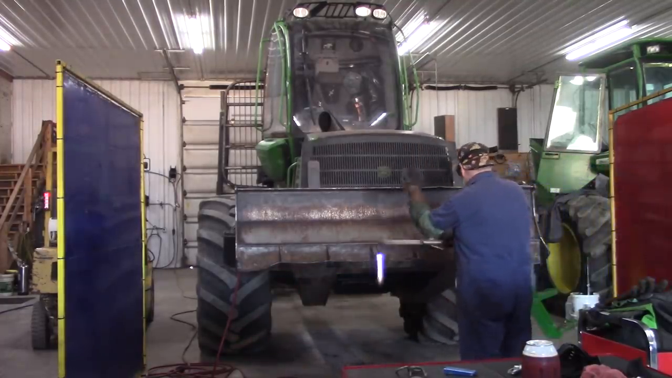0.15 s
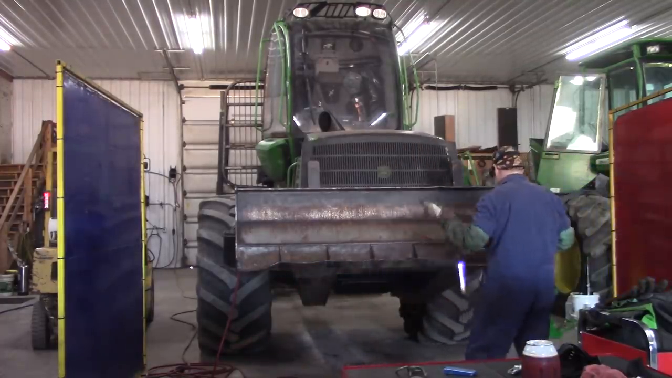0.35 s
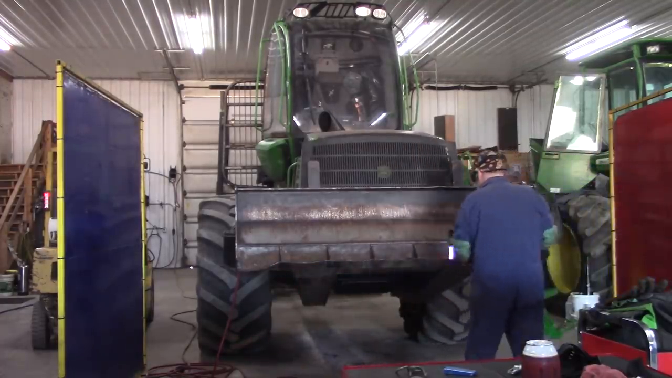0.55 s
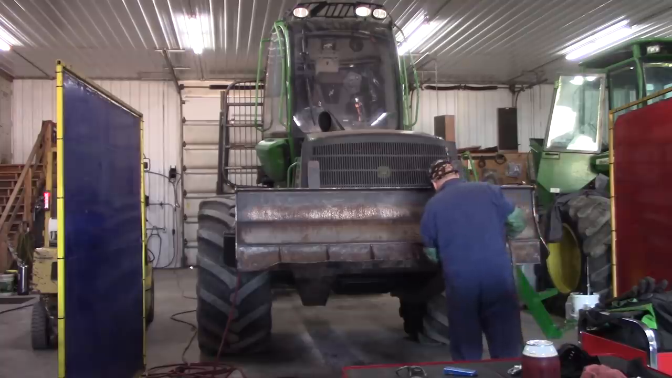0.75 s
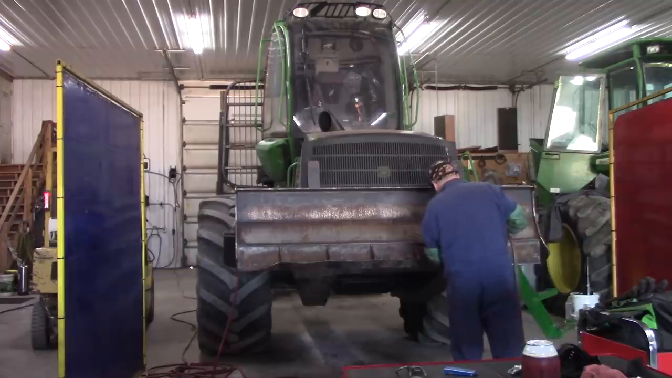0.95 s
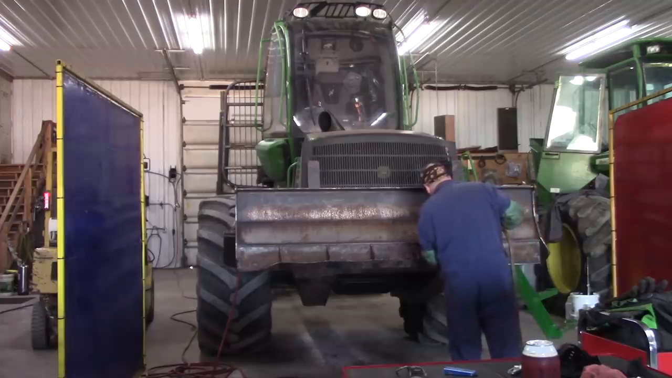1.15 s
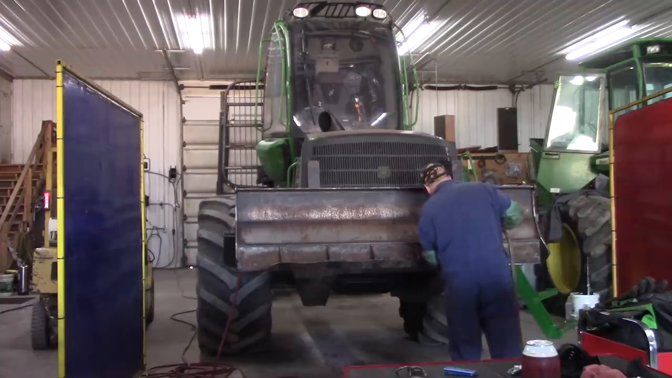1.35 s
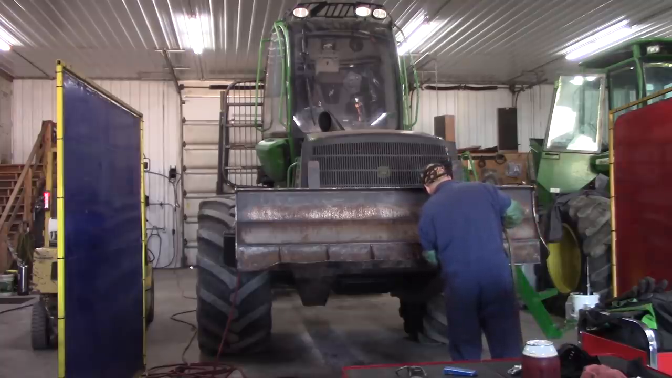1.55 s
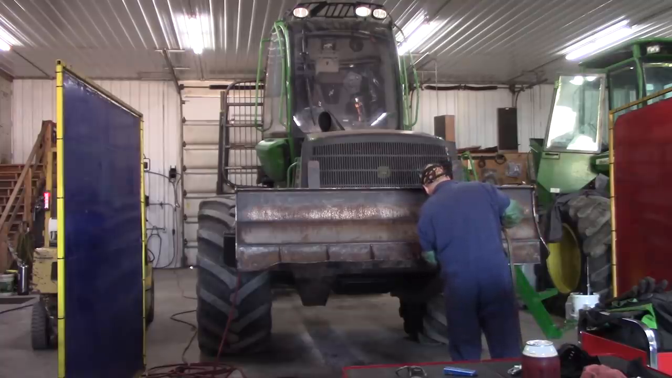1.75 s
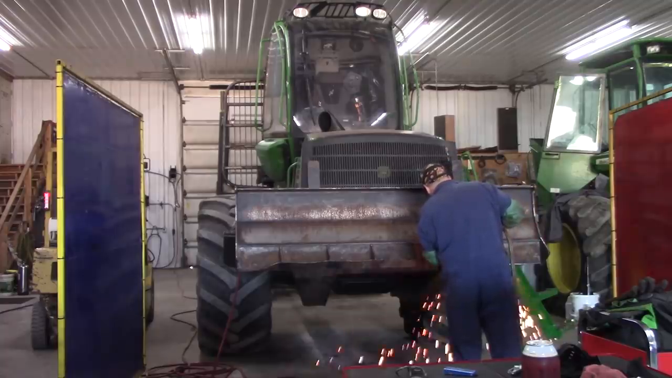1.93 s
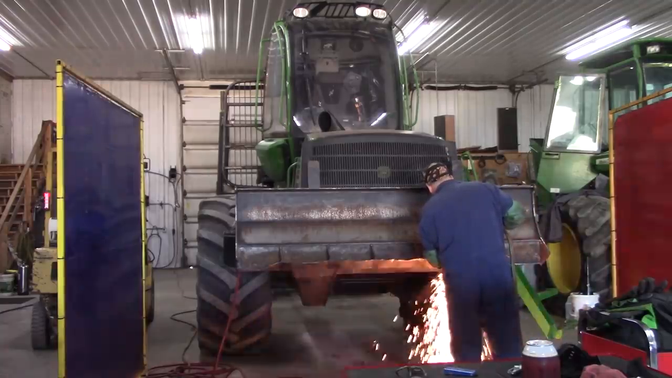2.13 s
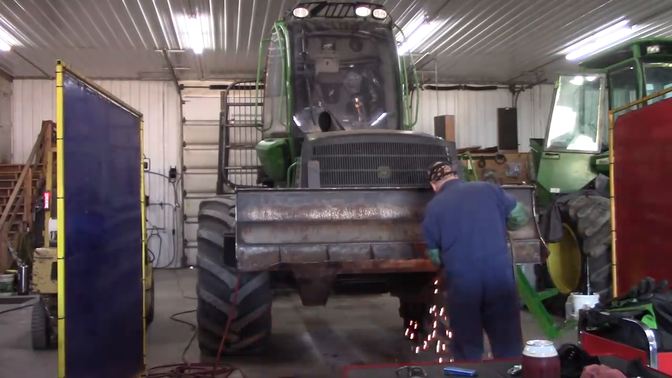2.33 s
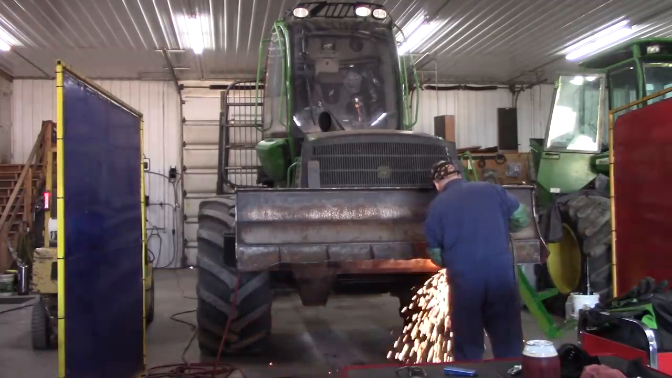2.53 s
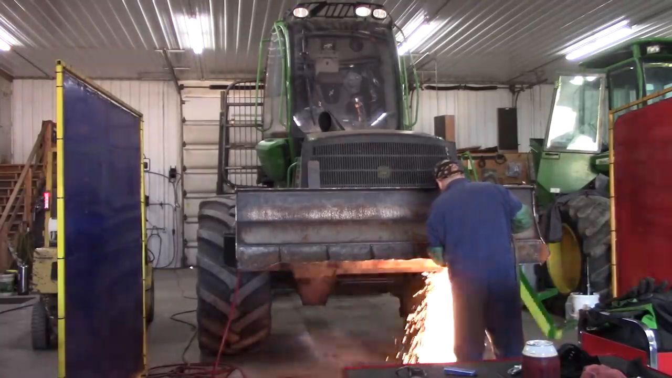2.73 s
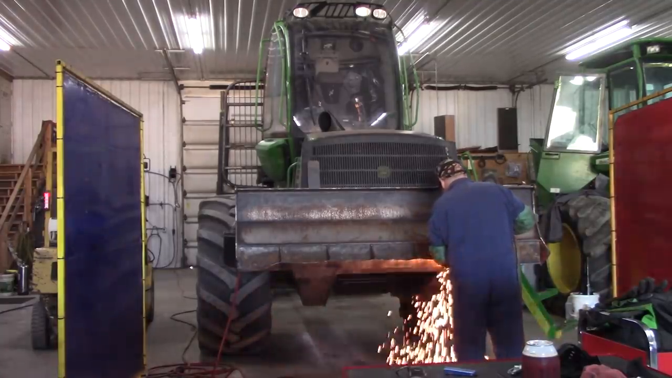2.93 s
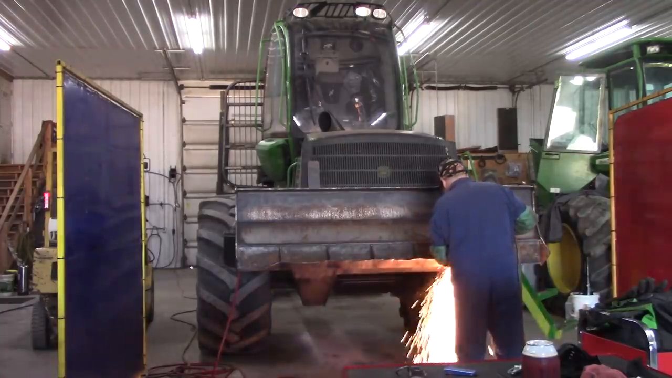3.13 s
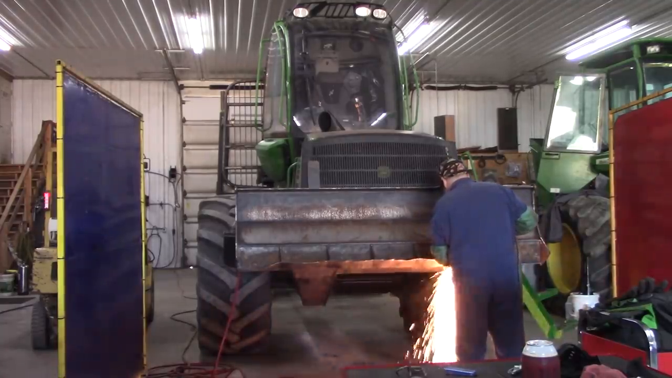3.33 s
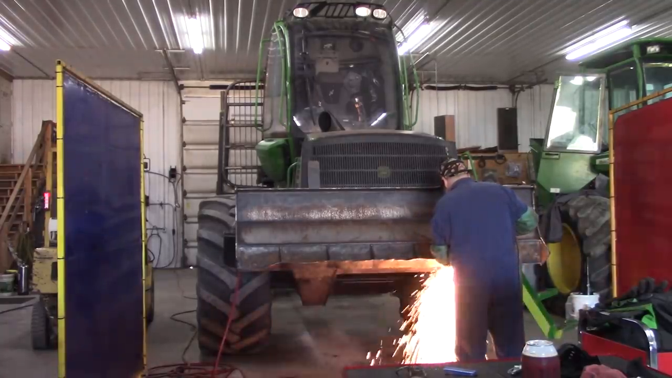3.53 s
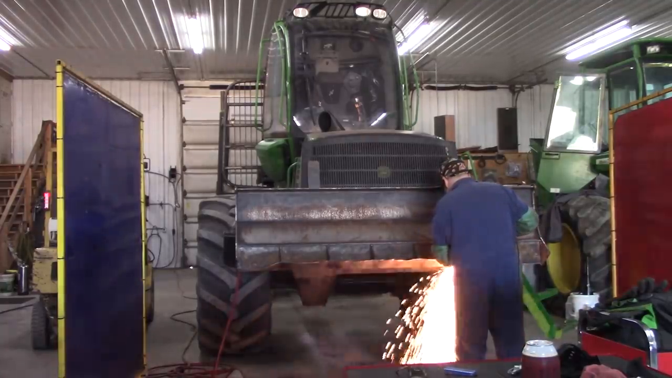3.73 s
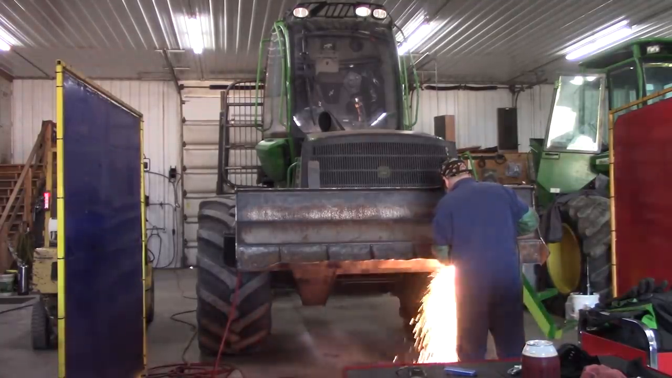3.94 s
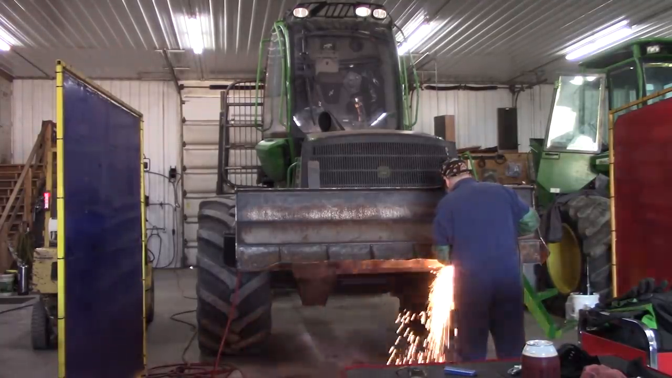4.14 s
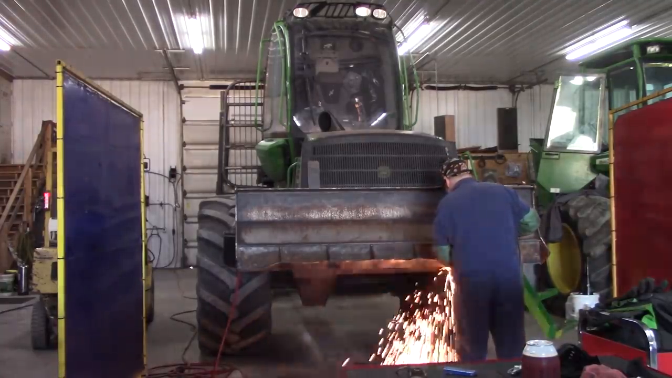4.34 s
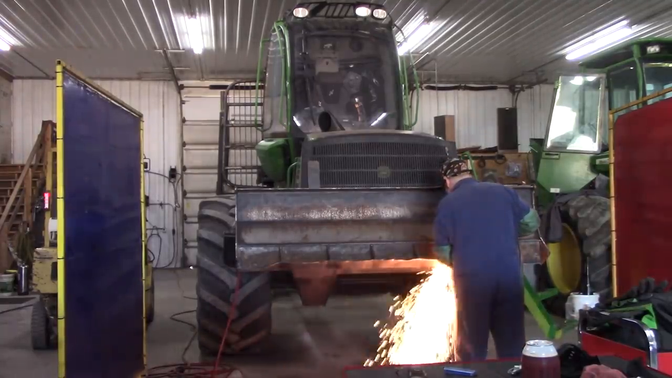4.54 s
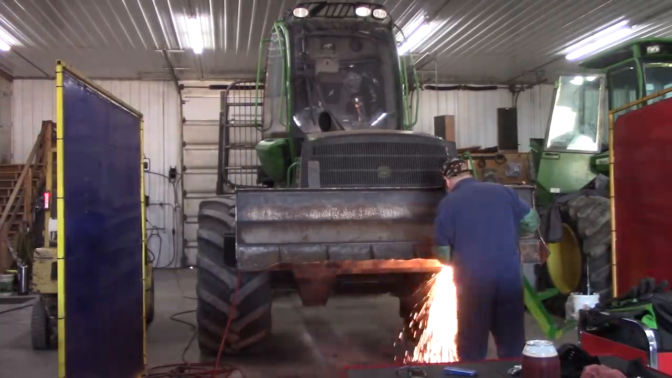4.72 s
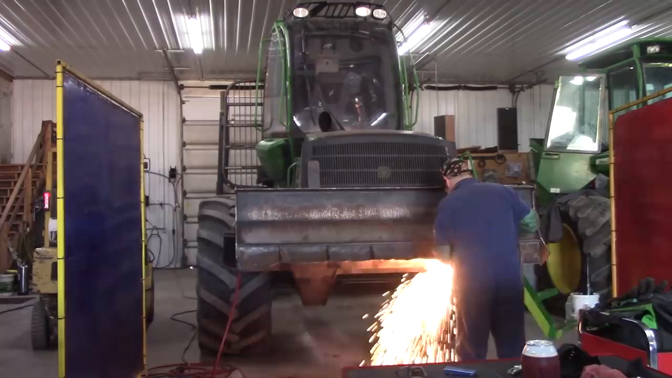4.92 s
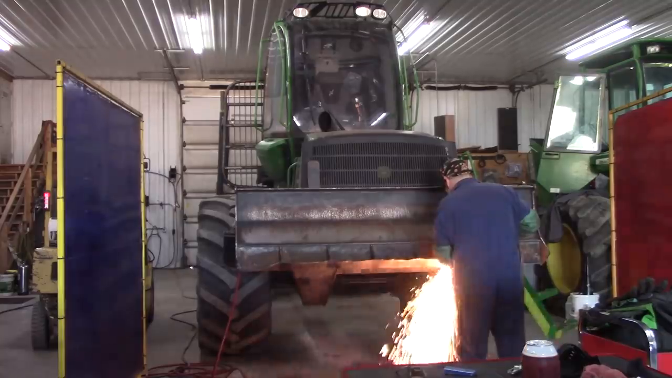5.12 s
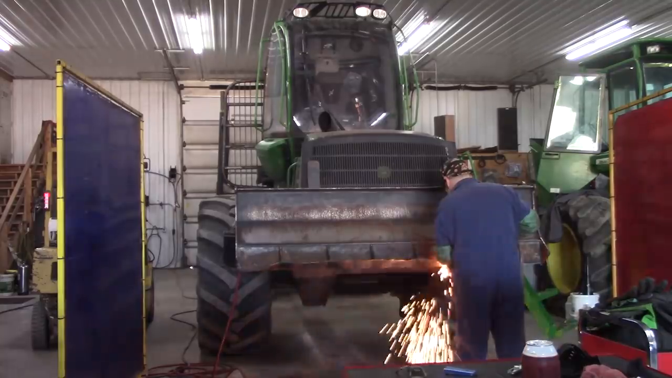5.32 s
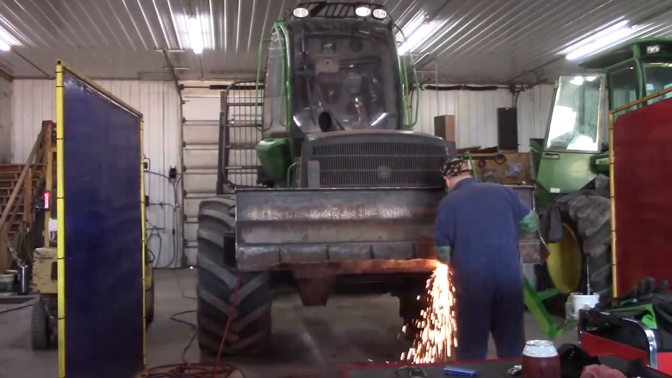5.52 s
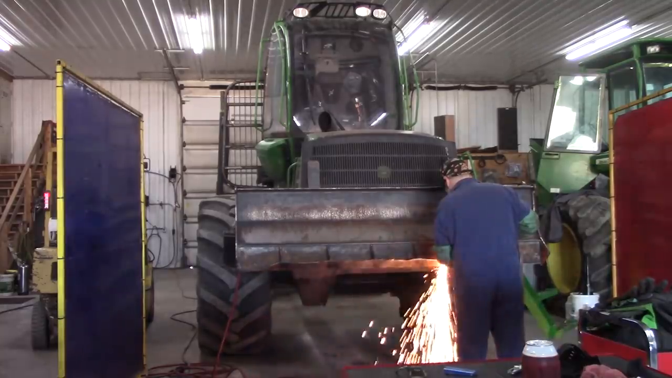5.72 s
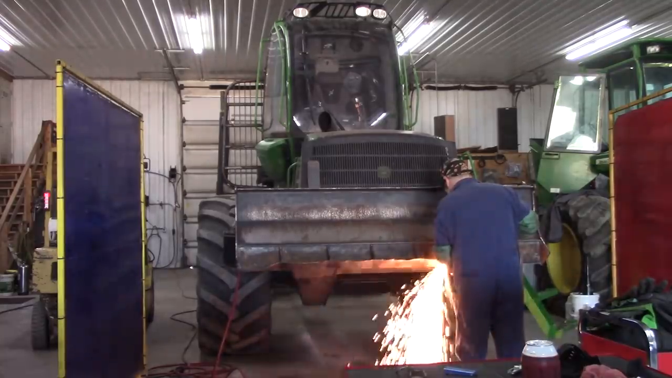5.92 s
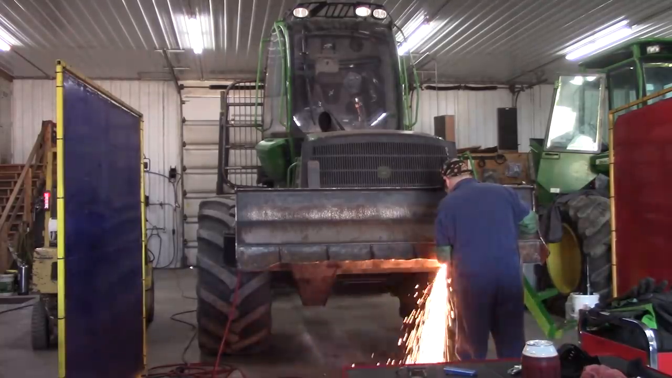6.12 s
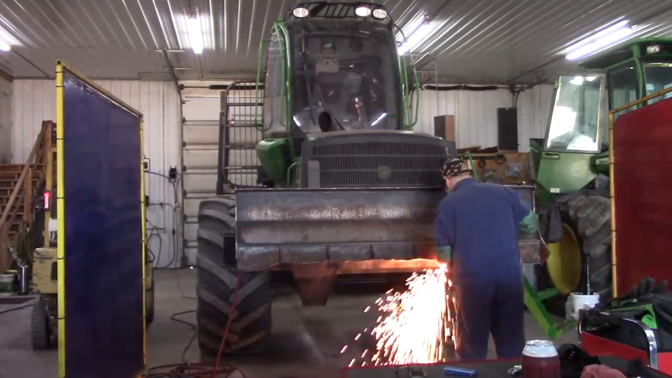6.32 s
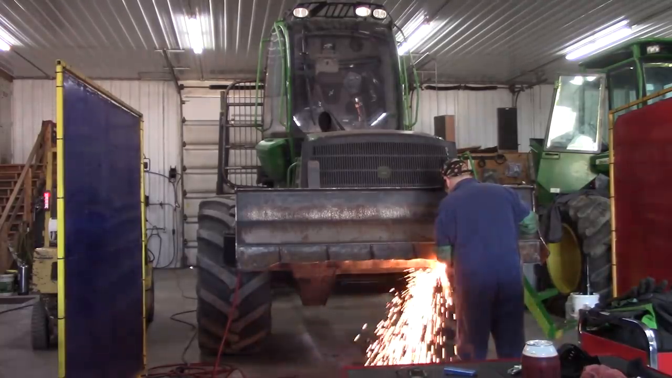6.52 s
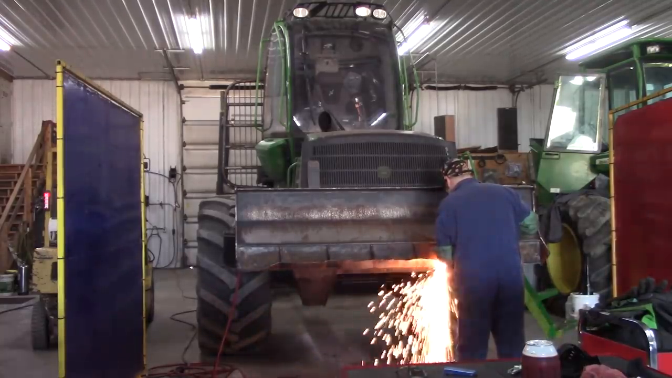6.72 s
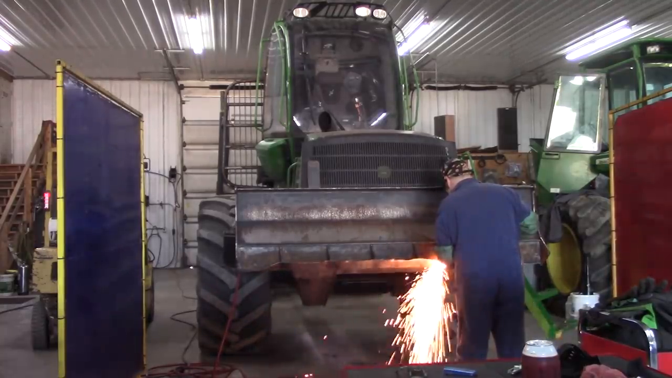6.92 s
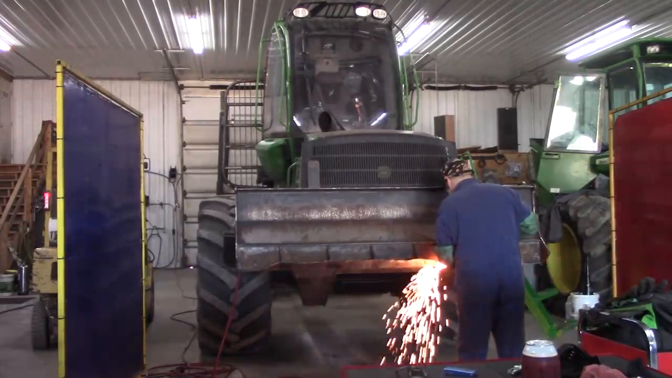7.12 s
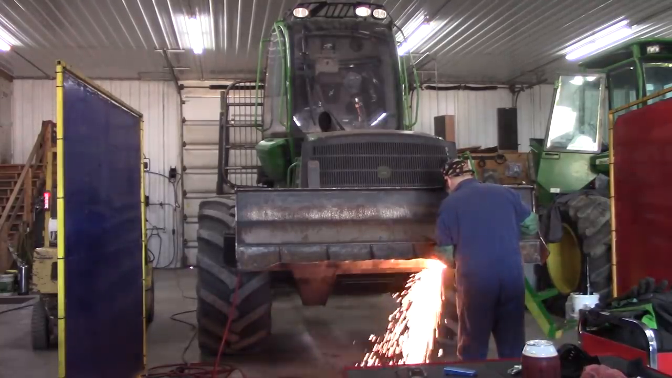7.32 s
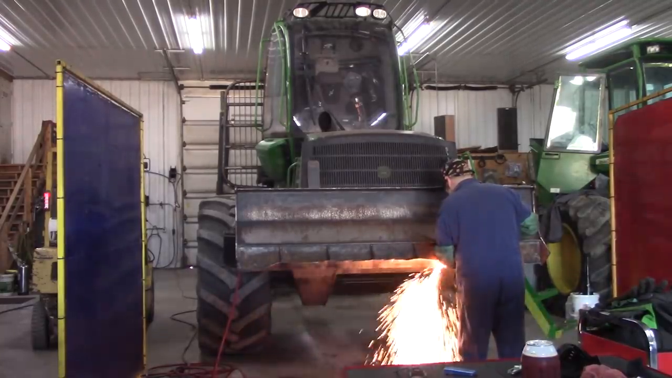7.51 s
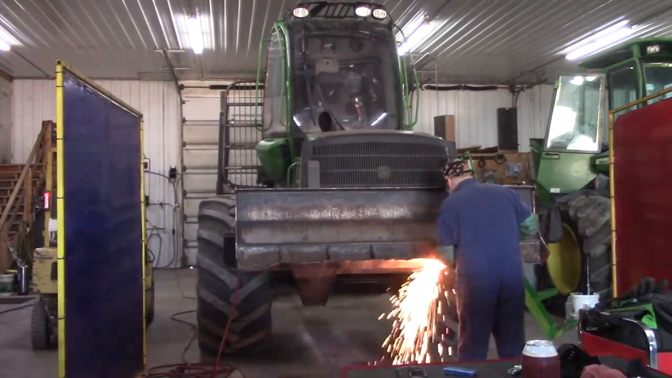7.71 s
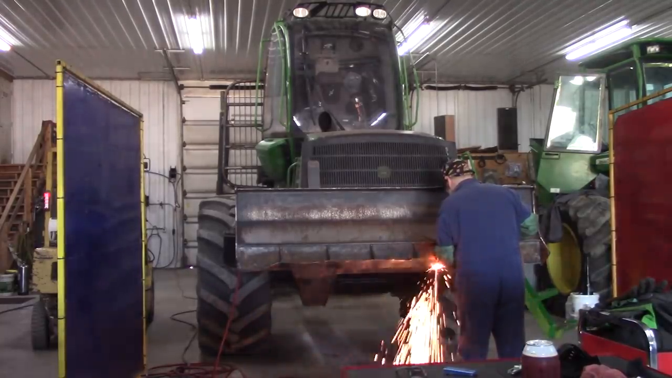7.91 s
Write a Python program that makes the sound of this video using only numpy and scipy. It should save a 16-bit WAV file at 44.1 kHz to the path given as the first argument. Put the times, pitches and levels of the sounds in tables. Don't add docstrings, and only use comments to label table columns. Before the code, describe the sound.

A strong compressed-air jet rushes across a steel blade, fluttering and whistling in its gaps for under a second, then shuts to a thin leaking hiss. About a second later the air puffs back on and a carbon arc strikes, tearing into steel with dense crackle, spitting melt, low sputter and snaps, surging and faltering to the end. Close microphone, nearly mono, in a hard-walled shed with a short bright echo.

```python
import sys
import numpy as np
from scipy import signal
from scipy.fft import rfft, irfft, next_fast_len
from scipy.io import wavfile
from scipy.ndimage import uniform_filter1d

SR = 44100
rng = np.random.default_rng(int(sys.argv[2]) if len(sys.argv) > 2 else 0)


def gain_from_decibels(decibels):
    exponent = np.asarray(decibels, float) / 20
    return 10 ** exponent


def to_wav(s):
    ch = np.atleast_2d(s).T
    pcm = np.round(np.clip(ch, -1, 1) * 32767)
    wavfile.write(sys.argv[1], SR, pcm.astype(np.int16))


N = 355446
T = np.arange(N) / SR
QUARTER = SR // 4


def evened(x):
    return x / np.sqrt(np.mean(x ** 2) + 1e-20)


def read(points, hz):
    f, value = np.transpose(points)
    return np.interp(np.log(hz + 1), np.log(f + 1), value)


def colour(x, points):
    size = next_fast_len(N)
    gain = gain_from_decibels(read(points, np.fft.rfftfreq(size, 1 / SR)))
    return irfft(rfft(x, size) * gain, size)[..., :N]


def level(rows, axis):
    rows = np.array(rows)
    return gain_from_decibels(np.interp(T, rows[:, 0], rows[:, axis], left=-120, right=-120))


def drift(hz):
    return evened(signal.lfilter(*signal.butter(2, hz, fs=SR), rng.standard_normal(N)))


def turbulence(points, patchy_db, flutter_db, flutter_hz):
    real, imag, patches = rng.standard_normal((N // 128 + 5, 257, 3)).T
    patches = uniform_filter1d(patches, size=5, axis=0)
    patches = evened(uniform_filter1d(patches, size=20, axis=1))
    spectra = (real + 1j * imag) * gain_from_decibels(patchy_db * patches)
    noise = signal.istft(spectra, nperseg=512, noverlap=384)[1][:N]
    return evened(evened(colour(noise, points)) * gain_from_decibels(flutter_db * drift(flutter_hz)))


def crackle(per_s, spread_db):
    size = gain_from_decibels(spread_db * np.minimum(rng.exponential(1, N), 4)) * rng.choice([-1., 1.], N)
    return evened(size * (rng.random(N) < per_s / SR))


def steadied(x, share, size):
    return evened(x / (uniform_filter1d(x ** 2, size=size) + 1e-3) ** (share / 2))


def whistles(rows, share):
    out = np.zeros(N)
    for s, length, hz0, hz1, db in rows:
        n = round(length * SR)
        pole = np.exp(-np.pi * share * hz0 / SR)
        fuzz = rng.standard_normal((SR * 9 // 10, 2)) @ [1, 1j]
        for _ in range(2):
            fuzz = signal.lfilter([1], [1, -pole], fuzz)
        phase = 2 * np.pi * np.cumsum(np.linspace(hz0, hz1, n)) / SR
        tone = (fuzz[-n:] * np.exp(1j * phase)).real
        out[round(s * SR):][:n] += gain_from_decibels(db) * evened(tone) * signal.windows.tukey(n, .6)
    return out


def resonate(x, modes, lift_db=-0.2):
    size = next_fast_len(N)
    hz = np.fft.rfftfreq(size, 1 / SR)
    gain = 1 + sum(gain_from_decibels(db + lift_db) / (1 + (2 * (hz - f) / w) ** 2) for f, w, db in modes)
    return gain_from_decibels(-1.74) * irfft(rfft(x, size) * gain, size)[:N]


def moves(rows, axis):
    linger = 0.86
    return sum(np.interp(T, [row[0] - row[1], row[0], row[0] + linger * row[1]], [0, row[axis], 0])
               for row in rows)


def bursts(rows, trim_db):
    rise_s, fall_share = 0.0019, 0.17
    out, t = np.zeros(N), T[:QUARTER]
    for s, length, db in rows:
        fall = np.exp(-np.maximum(t - length, 0) / (fall_share * length))
        shape = gain_from_decibels(db + trim_db) * np.minimum(t / rise_s, 1) * fall
        part = out[round(s * SR):][:len(t)]
        part += shape[:len(part)]
    return out


# f/Hz, t60/s
SHED_DECAY = [(300, 0.24), (1500, 0.56), (5000, 0.54), (14000, 0.29)]


def shed(x):
    taps = np.zeros((2, SR))
    at = np.arange(300, SR - 20, 20) + rng.integers(0, 20, (2, (SR - 301) // 20))
    np.put_along_axis(taps, at, rng.choice([-1., 1.], at.shape), 1)
    hz, t, z = signal.stft(taps, SR, nperseg=256)
    decay = gain_from_decibels(-60 * t / read(SHED_DECAY, hz)[:, None])
    tail = signal.istft(z * decay, SR, nperseg=256)[1]
    return signal.fftconvolve(x[None], tail / np.linalg.norm(tail[0]), axes=1)[:, :N]


# t/s, level/dB
HUM_LEVEL = [(0, -71), (2.2, -71), (4.5, -78), (8.1, -80)]
# multiple of the hum pitch, level/dB
HUM_PARTIALS = [(1, 0), (2, -9), (7 / 3, -8)]


def hum():
    hum_hz, waver_db, waver_hz = 180, 2.5, 2.3
    waver = gain_from_decibels(waver_db * np.sin(2 * np.pi * waver_hz * T + np.sin(5 * T)))
    tones = sum(gain_from_decibels(db) * np.sin(2 * np.pi * k * hum_hz * T) for k, db in HUM_PARTIALS)
    return level(HUM_LEVEL, axis=1) * waver * tones


# t/s, length/s, start f/Hz, end f/Hz, level/dB
MOTOR_WHINES = [
    (1.12, .46, 232, 274, -65),
    (2.75, .45, 255, 300, -63),
    (3.1, .8, 525, 525, -58),
    (4.55, .6, 488, 530, -54),
    (5.1, .7, 528, 525, -60),
]


def motor():
    return whistles(MOTOR_WHINES, share=.005)


# t/s, level/dB
LEAK_LEVEL = [(0, -24.5), (.9, -37.5), (1.1, -37), (1.3, -37.5), (1.45, -38), (1.55, -38), (1.65, -36),
              (1.83, -38), (8.1, -44.5)]
# f/Hz, level/dB per Hz
LEAK_SPECTRUM = [(150, -32), (215, -29), (270, -15.5), (450, -12.5), (620, -5), (900, -7.5), (1500, -3),
                 (2200, -2), (3100, -3), (4600, -5), (6000, -2.5), (9000, -6.5), (15000, -8), (16500, -21)]
# f/Hz, width/Hz, level/dB
LEAK_LINES = [(1820, 70, -7), (2520, 49, -2.5), (3110, 70, -1.5), (3390, 60, -4), (5780, 140, -12)]


def leak():
    hiss = level(LEAK_LEVEL, axis=1) * turbulence(LEAK_SPECTRUM, 1.7, 0.85, 10.0)
    return gain_from_decibels(1.5) * resonate(hiss, LEAK_LINES)


# t/s, level/dB
SWEEP_LEVEL = [(0.0, -20), (0.03, -21.5), (0.27, -20.5), (0.335, -23), (0.4, -20.5), (0.664, -20),
               (0.76, -43.5), (0.87, -32.5), (0.96, -48)]
# f/Hz, level/dB per Hz
SWEEP_SPECTRUM = [(88, -81), (230, -46), (425, -10), (847, -7.5), (1100, -0.5), (1600, 0), (2350, -4.5),
                  (3000, -1.5), (4780, -8), (9700, -12), (12800, -19.5), (15600, -34), (16500, -49)]


def sweep():
    return level(SWEEP_LEVEL, axis=1) * gain_from_decibels(-2.0) * turbulence(SWEEP_SPECTRUM, 3.2, 0.82, 57)


# t/s, length/s, start f/Hz, end f/Hz, level/dB
GAP_WHISTLES = [(0, 0.018, 1570, 1530, -21), (.05, .11, 2890, 2850, -26), (.06, 0.11, 1880, 1874, -28),
                (.119, 0.057, 1270, 1346, -31), (.19, 0.045, 1492, 1510, -21),
                (.24, 0.038, 2550, 2650, -30), (.284, 0.028, 2684, 2770, -16), (.31, .13, 2880, 2560, -33),
                (.355, 0.075, 910, 1122, -30), (.36, 0.08, 2300, 2117, -23), (.39, 0.062, 3850, 3850, -25),
                (.414, 0.13, 1340, 1310, -31), (.46, 0.065, 2180, 2234, -27),
                (.487, 0.044, 1800, 1770, -29), (.52, 0.086, 1515, 1450, -30),
                (.6, 0.12, 3640, 3640, -32.5)]
# t/s, length/s, start f/Hz, end f/Hz, level/dB
EDGE_RUSHES = [
    (0, 0.31, 1510, 1410, -35),
    (.24, .2, 2798, 2450, -25),
    (.24, 0.096, 4320, 4480, -26.5),
    (.36, 0.16, 3510, 3233, -28),
    (.421, 0.3, 1902, 1506, -26),
    (.562, 0.14, 788, 699, -35.5),
    (1.845, 0.11, 3247, 3403, -27),
    (1.85, 0.092, 6070, 6480, -28),
]
# f/Hz, level/dB
EDGE_BALANCE = [(150, -32), (400, 7), (700, -1)]


def edges():
    singing = whistles(GAP_WHISTLES, share=0.072) + whistles(EDGE_RUSHES, share=0.32)
    return colour(singing, EDGE_BALANCE)


# t/s, level/dB
TORCH_AIR = [(1.83, -49), (1.855, -20), (1.92, -24), (2.0, -31.5), (2.09, -28), (2.12, -25), (2.65, -26),
             (3.2, -25.5), (3.4, -27.5), (3.6, -25), (4.2, -27), (4.55, -24), (5.1, -27), (5.7, -24),
             (6.05, -24), (6.45, -24.5), (7.3, -26), (8.06, -26)]
# t/s, rise/s, arc lift/dB, jet lift/dB
ROD_BITES = [(2.171, 0.08, 16, -0.5), (2.6, 0.015, 27, -2), (2.831, 0.026, 19, 0), (3.07, 0.051, 11, 1.5),
             (3.21, 0.021, 9, 1.2), (3.47, 0.024, 4, -1), (3.562, 0.076, 17.5, 3), (3.68, 0.14, 11.5, -1),
             (3.918, 0.065, 14.5, 4), (4.05, 0.079, 14.5, 2), (4.16, 0.095, 14, 2), (4.37, 0.063, 8, 0.5),
             (4.6, 0.028, 10, -8), (4.72, 0.031, 17, -6), (4.83, 0.08, 0, 3.5), (4.95, 0.089, 0, 5.5),
             (5.12, 0.05, 10.5, -1), (5.289, 0.12, 15.5, 0.5), (5.462, 0.008, 4, 6), (5.58, 0.022, 14, 4),
             (5.87, 0.037, 6, -2), (6.12, 0.18, 6.5, -4.5), (6.53, 0.053, 14.5, 1.5), (6.88, 0.04, -9, 0.5),
             (7.02, 0.045, 2, 2), (7.5, 0.02, 14, 2), (7.63, 0.034, 6.5, -1.5), (7.78, 0.01, 12, 1),
             (7.95, 0.11, -3, 3.5), (8.04, 0.03, 10, 2.5)]
# t/s, rise/s, arc lift/dB, jet lift/dB
ARC_FALTERS = [(2.31, .03, -14, 3.5), (2.57, 0.11, -20, 2), (2.65, 0.065, -27, 1), (2.72, 0.046, -39, 0),
               (3.04, 0.071, -14, -1), (3.42, 0.038, -14, 1), (3.8, 0.059, -3, -1), (4.3, 0.034, -9, 1),
               (4.68, 0.026, -12, -3), (4.77, 0.03, 3, -5), (5.42, 0.053, -5, -2), (5.53, 0.053, -16, -3),
               (5.73, 0.1, -15, 0.2), (5.95, 0.06, -39, -5.5), (6.49, 0.049, -22, 0.5),
               (6.72, 0.13, 0, -2.5), (6.95, 0.047, -24, -1.5), (7.11, 0.14, -8, 1),
               (7.26, 0.067, -14, 1.5), (7.4, 0.044, -11, -2.5), (7.75, 0.042, -28, 0),
               (7.85, 0.093, -14, 0)]


def torch_feed():
    strike_s, unlit_db = 2.105, -3
    arc_db = moves(ROD_BITES + ARC_FALTERS, axis=2) + unlit_db * (T < strike_s)
    air = level(TORCH_AIR, axis=1) * gain_from_decibels(moves(ROD_BITES + ARC_FALTERS, axis=3))
    return arc_db, air


def valve_blast(push):
    start_s, hold_s, fade_db_per_s = 1.84, 0.06, 92
    return np.clip(push, 0, 1) * gain_from_decibels(-fade_db_per_s * np.maximum(T - start_s - hold_s, 0))


# t/s, thump level/dB, crack level/dB
ARC_FLARES = [(2.108, -31, -30), (2.146, -18, -35), (2.595, -39, -23.5), (2.809, -27, -30),
              (3.06, -28, -31), (3.204, -20.5, -17), (3.318, -22.5, -20), (3.429, -27, -22),
              (3.524, -23, -25), (3.918, -30, -38), (4.029, -23, -21), (4.359, -32, -19), (4.393, -34, -18),
              (4.451, -32, -25), (4.595, -42, -16.5), (4.702, -28, -23), (4.838, -50, -18),
              (5.078, -31, -38), (5.456, -35, -31), (5.574, -28.5, -26), (6.102, -33, -21),
              (6.151, -39, -25), (6.328, -38, -26), (6.508, -24, -16), (6.637, -36, -16), (6.861, -33, -19),
              (7.319, -43, -33), (7.47, -34, -21.5), (7.594, -40, -27), (7.924, -37, -23)]


def flare(axis, trim_db):
    rise_s, fall_s = 0.0018, 0.033
    out, t = np.zeros(N), T[:QUARTER]
    shape = (1 - np.exp(-t / rise_s)) * np.exp(-t / fall_s)
    for row in ARC_FLARES:
        part = out[round(row[0] * SR):][:len(t)]
        part += gain_from_decibels(row[axis] + trim_db) * shape[:len(part)]
    return out


# t/s, length/s, level/dB
MELT_SPITS = [(2.1094, 0.011, -20.6), (2.7076, 0.0084, -37), (2.8263, 0.032, -21.5), (2.8496, 0.0025, -27),
              (2.9556, 0.017, -30), (3.2012, 0.026, -27), (3.4555, 0.011, -27.4), (3.6305, 0.0113, -21),
              (3.9067, 0.026, -34), (4.1729, 0.0192, -24.5), (4.2529, 0.0096, -26), (4.3591, 0.0155, -25),
              (4.5795, 0.013, -20.5), (4.5947, 0.014, -20.5), (4.6057, 0.0012, -23.7),
              (4.6976, 0.0226, -26.5), (4.872, 0.02, -23.5), (5.0188, 0.011, -24), (5.1078, 0.0158, -24.1),
              (5.1764, 0.0107, -24.1), (5.2684, 0.014, -29), (5.4577, 0.014, -24.5), (5.5669, 0.018, -23),
              (5.6764, 0.0065, -31), (5.7716, 0.0093, -39), (5.8604, 0.0074, -22), (6.0301, 0.012, -25),
              (6.0567, 0.0077, -26), (6.1013, 0.027, -25.5), (6.1534, 0.0154, -25.4),
              (6.3298, 0.012, -23.5), (6.5653, 0.0063, -26), (6.5642, 0.015, -25.5), (6.6368, 0.02, -28),
              (6.8177, 0.016, -25.0), (6.8666, 0.012, -28), (7.1769, 0.0163, -32), (7.2624, 0.012, -37),
              (7.3159, 0.011, -25), (7.3567, 0.0114, -33), (7.4765, 0.0052, -22), (7.4692, 0.029, -26),
              (7.5563, 0.017, -22), (7.5924, 0.007, -19), (7.6283, 0.0174, -24.5), (7.7087, 0.011, -28),
              (7.9216, 0.0304, -26), (8.0293, 0.0101, -23.3)]


def melt_spits():
    return bursts(MELT_SPITS, trim_db=-4.5)


# t/s, length/s, level/dB
ARC_POPS = [(2.5941, 0.012, -34), (2.6849, 0.0177, -44.9), (2.8082, 0.035, -26.5), (3.1655, 0.0116, -33),
            (3.2109, 0.014, -30.5), (3.3359, 0.0109, -28), (3.4523, 0.018, -31), (3.5485, 0.018, -25),
            (3.9057, 0.025, -24), (4.252, 0.021, -34.5), (4.3178, 0.0143, -33), (4.3934, 0.0093, -26),
            (4.4502, 0.017, -29), (4.5933, 0.011, -30), (4.6991, 0.022, -30.5), (4.8663, 0.016, -37.5),
            (5.077, 0.01, -35), (5.1235, 0.018, -26), (5.2985, 0.014, -28.3), (5.4539, 0.0175, -33),
            (5.5734, 0.011, -34), (5.6488, 0.012, -36), (5.8585, 0.026, -36.1), (6.0507, 0.021, -37),
            (6.1506, 0.015, -34), (6.3279, 0.015, -33), (6.5108, 0.0057, -24), (6.5242, 0.017, -36),
            (6.6343, 0.019, -34), (6.8133, 0.0213, -49), (6.8598, 0.013, -34), (6.886, 0.0096, -42),
            (7.3112, 0.015, -45), (7.4111, 0.024, -39), (7.4875, 0.0282, -33), (7.5055, 0.0046, -31),
            (7.7013, 0.0204, -44), (7.7776, 0.013, -36), (7.8254, 0.014, -38), (7.9202, 0.024, -36.5)]


def arc_pops():
    return bursts(ARC_POPS, trim_db=-4.5)


# t/s, peak level/dB
DISCHARGES = [(2.112, -20), (2.827, -19), (4.03, -15), (4.049, -17), (5.459, -14), (5.592, -19),
              (6.102, -19), (6.54, -17), (6.546, -14), (6.638, -15), (7.47, -14), (7.495, -17), (7.56, -20),
              (8.018, -15), (8.031, -12)]


def snaps():
    half_s = 0.000092
    out, u = np.zeros(N), T[:200] / half_s
    for s, db in DISCHARGES:
        out[round(s * SR):][:len(u)] -= gain_from_decibels(db) * (1 - u) * np.exp(-u)
    return out


# f/Hz, level/dB per Hz
BOOM_SPECTRUM = [(40, 2), (100, -7), (200, -24), (300, -10), (1000, -60)]


def boom(burn):
    return gain_from_decibels(12.0) * burn ** 2 * evened(colour(rng.standard_normal(N), BOOM_SPECTRUM))


# f/Hz, level/dB per Hz
HISS_SPECTRUM = [(1500, -30), (3000, -9), (5000, -6), (8000, 0), (11000, 2), (15500, 2), (16500, -32)]


def torch_hiss(air, crack, spit):
    return (air + 0.28 * crack + 0.25 * spit) * turbulence(HISS_SPECTRUM, 1.4, 0.67, 36)


# f/Hz, level/dB per Hz
SPRAY_SPECTRUM = [(1200, -28.5), (2300, -14), (3200, 0), (4500, -1), (6200, -1), (9000, -4), (16500, -26)]
# t/s, rise/s, spray lift/dB
SPRAY_FANS = [
    (4.88, 0.19, 4.5),
    (5.22, 0.1, 3.5),
    (4.3, .05, 1),
    (6.22, 0.072, -0.5),
    (6.52, 0.034, 0),
    (8.0, .05, 5),
]


def spray(arc_db, push, blast, crack, spit, current, sparks):
    noise = 0.66 * turbulence(SPRAY_SPECTRUM, 2.5, 0.74, 90)
    noise = noise + 0.6 * evened(colour(sparks, SPRAY_SPECTRUM))
    gain = gain_from_decibels(-35 + 0.42 * arc_db + moves(SPRAY_FANS, axis=2)) * push ** 0.59
    gain = gain + gain_from_decibels(-28.5) * blast
    return np.hypot(np.hypot(gain, crack) * current ** 0.69, 0.9 * spit) * noise


# f/Hz, level/dB per Hz
ROAR_SPECTRUM = [(400, -30.5), (800, -9), (1150, -1), (1800, 0), (2500, -2), (3500, -10.5), (7000, -35)]
# t/s, rise/s, roar lift/dB
ROD_PLUNGES = [
    (2.9, 0.066, 2.5),
    (3.38, 0.1, 4.5),
    (3.67, 0.076, 3.5),
    (4.17, .06, 4),
    (4.6, .04, -4),
    (5.31, 0.11, 3.5),
    (5.87, 0.033, 2),
    (6.65, .05, 2),
    (7.63, 0.055, 4),
    (7.83, 0.034, 9),
]


def roar(arc_db, push, blast, crack, spit, pop, current, sparks):
    noise = 0.72 * turbulence(ROAR_SPECTRUM, 1.1, 0.29, 39)
    noise = steadied(noise + .5 * evened(colour(sparks, ROAR_SPECTRUM)), share=.6, size=400)
    gain = gain_from_decibels(-39 + 0.45 * arc_db + moves(ROD_PLUNGES, axis=2)) * push ** 0.26
    gain = gain + gain_from_decibels(-35) * blast
    return np.hypot(np.hypot(gain, 0.59 * crack) * current, 0.45 * spit + 0.22 * pop) * noise


# f/Hz, level/dB per Hz
SPUTTER_SPECTRUM = [(120, -47), (230, -52), (300, -8.5), (400, -6.5), (500, -10.5), (580, 1), (730, 3),
                    (860, -11), (1000, -1), (1500, -24), (4000, -32)]


def sputter():
    noise = 0.55 * turbulence(SPUTTER_SPECTRUM, 1.1, .5, 30)
    clicks = evened(colour(crackle(600, 4.8), SPUTTER_SPECTRUM))
    return steadied(noise + 0.37 * clicks, share=.7, size=600)


def arc():
    thump, crack = flare(axis=1, trim_db=-6.0), flare(axis=2, trim_db=-9.5)
    spit, pop = melt_spits(), arc_pops()
    arc_db, air = torch_feed()
    push = air / gain_from_decibels(-26.5)
    blast = valve_blast(push)
    current = gain_from_decibels(1.4 * drift(57.0))
    sparks = crackle(2500, 2.5)
    burn = np.hypot(np.hypot(gain_from_decibels(-47 + arc_db) * np.sqrt(push), thump) * current, pop)
    melt = spray(arc_db, push, blast, crack, spit, current, sparks)
    groove = roar(arc_db, push, blast, crack, spit, pop, current, sparks)
    return torch_hiss(air, crack, spit) + melt + groove + burn * sputter() + boom(burn) + snaps()


# f/Hz, width/Hz, level/dB
BLADE_MODES = [(1340, 60, -5), (1507, 21, 3), (1818, 114, -1.5), (2004, 30, 1), (2746, 45, 3),
               (3130, 25, -41), (3310, 21, -6), (3834, 180, 0.5), (4210, 57, -2), (4400, 19, 4),
               (4600, 38, 2), (5000, 41, 4), (5400, 22, -14), (6270, 48, -6), (6950, 110, -4.5)]


def blade(x):
    return resonate(x, BLADE_MODES)


# f/Hz, level/dB
PORT_DIFFERENCE = [(150, -40), (500, -37), (1000, -55), (2000, -30), (4000, -28), (8000, -17), (15000, -6)]


def scene():
    torch = leak() + blade(arc())
    dry = sweep() + edges() + motor() + torch
    tail, other = shed(dry)
    mid = gain_from_decibels(-1.24) * dry + gain_from_decibels(-6.5) * tail
    late = np.roll(torch, shift=QUARTER // 100)
    side = colour(0.2 * late + 0.3 * other, PORT_DIFFERENCE)
    mid = mid + hum()
    return np.array([mid + side, mid - side])


# f/Hz, level/dB
MIC_BAND = [(60, -33), (170, -9.5), (240, -1), (15900, 1), (16150, -70)]
# f/Hz, level/dB per Hz
MIC_NOISE = [(20, -9), (60, -7.5), (150, -10), (300, -5.5), (700, 3.5), (1500, -8), (3000, -9),
             (15900, -13), (16150, -90)]


def microphone(x):
    own = gain_from_decibels(-60.5) * evened(colour(rng.standard_normal((2, N)), MIC_NOISE))
    return colour(x, MIC_BAND) + own


def top_cut(x):
    return signal.sosfilt(signal.butter(12, 16790, fs=SR, output="sos"), x)


def record(dry):
    mix = microphone(dry)
    return top_cut(mix)


dry = scene()
out = record(dry)
to_wav(out)
```